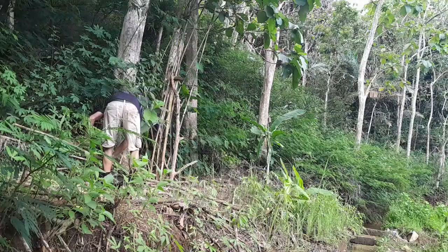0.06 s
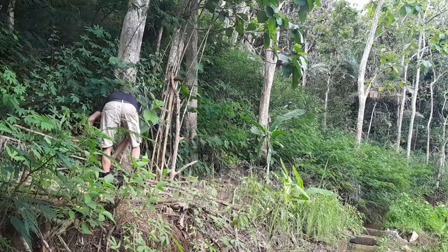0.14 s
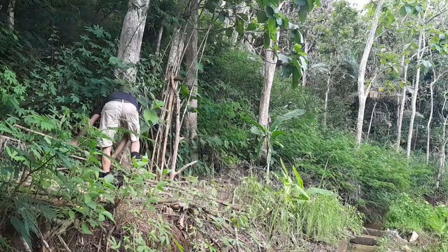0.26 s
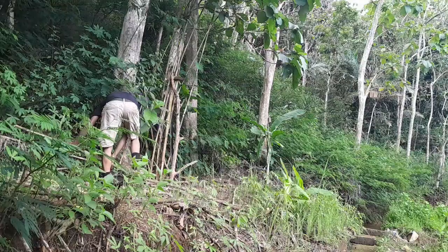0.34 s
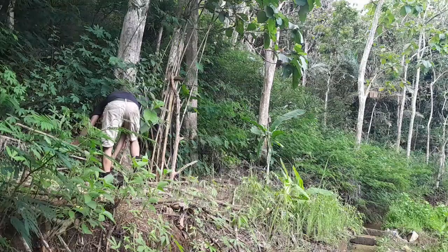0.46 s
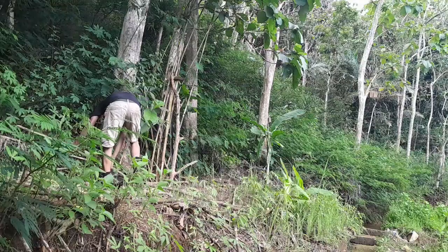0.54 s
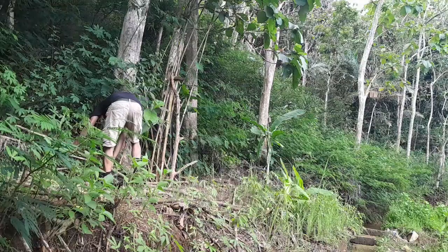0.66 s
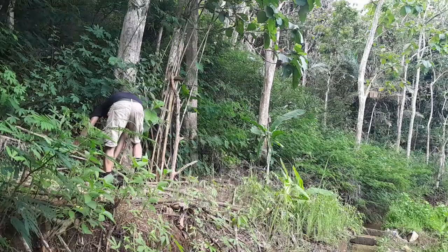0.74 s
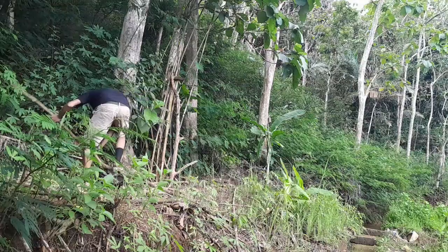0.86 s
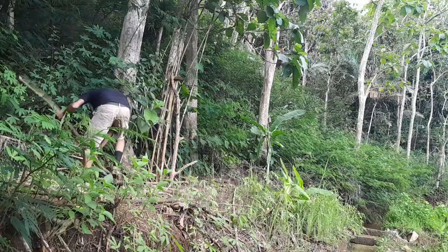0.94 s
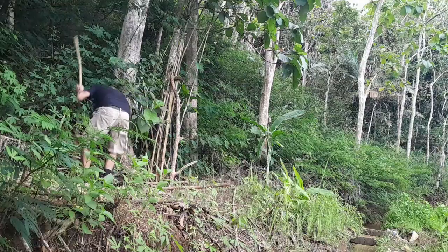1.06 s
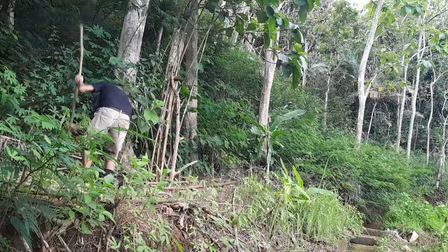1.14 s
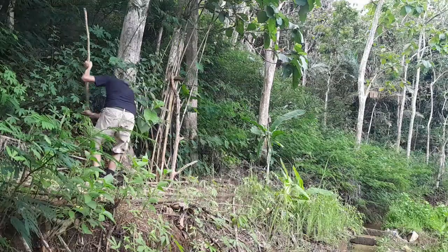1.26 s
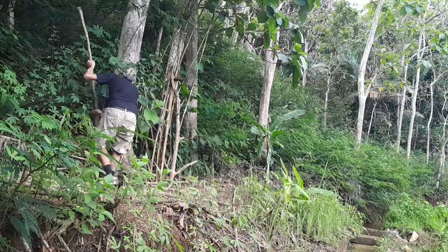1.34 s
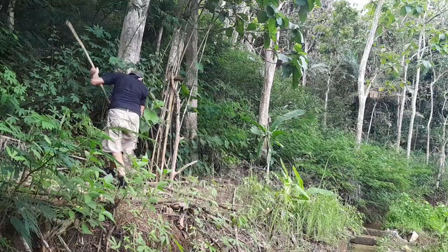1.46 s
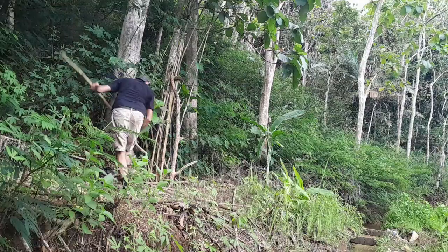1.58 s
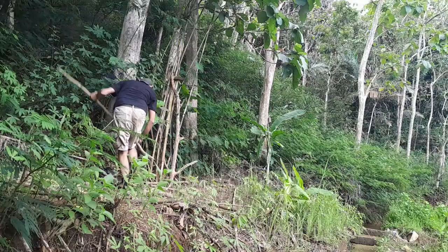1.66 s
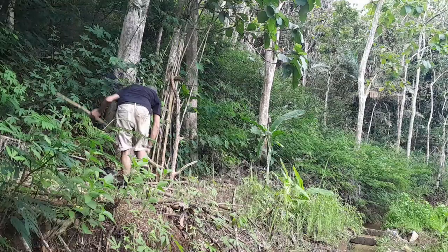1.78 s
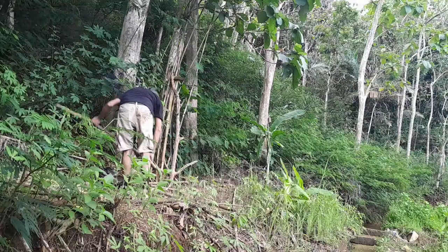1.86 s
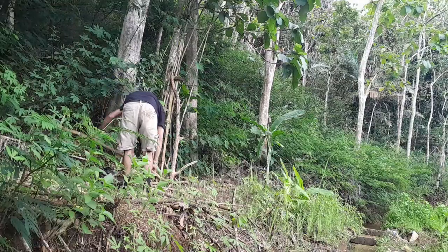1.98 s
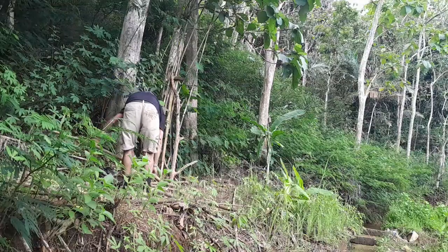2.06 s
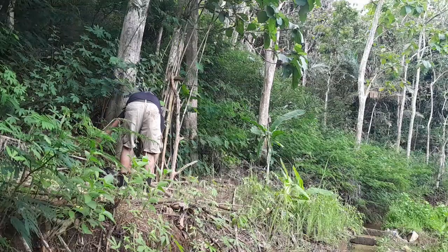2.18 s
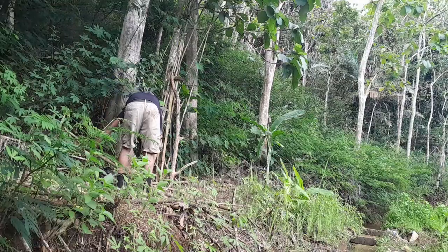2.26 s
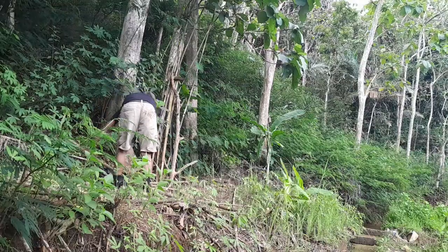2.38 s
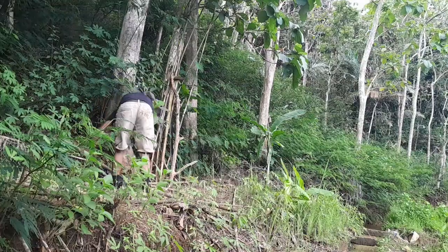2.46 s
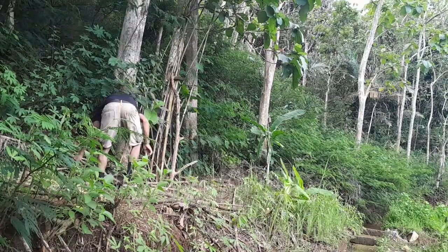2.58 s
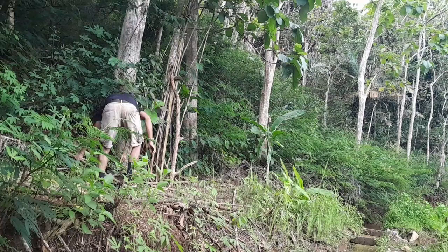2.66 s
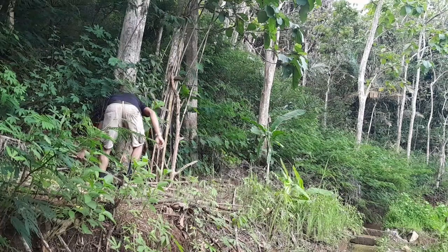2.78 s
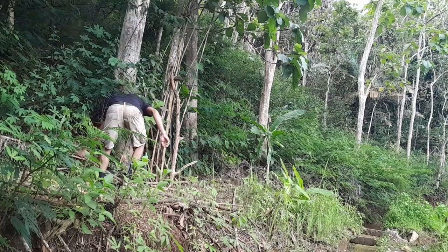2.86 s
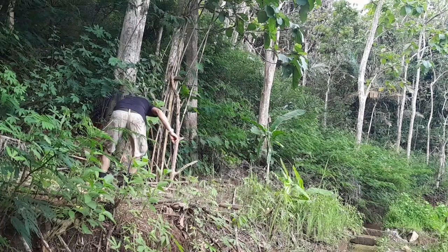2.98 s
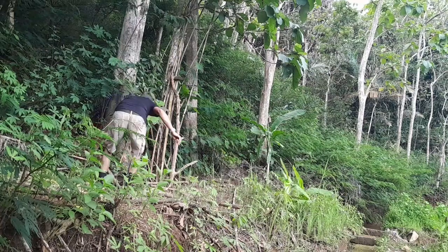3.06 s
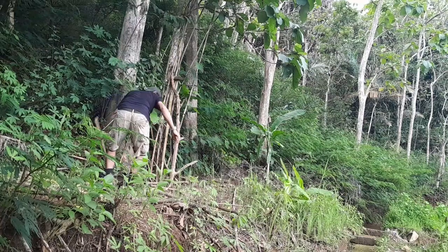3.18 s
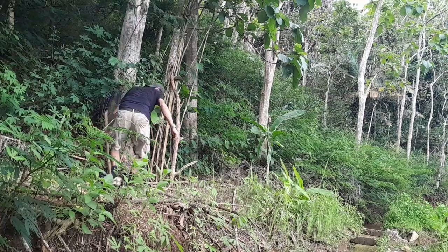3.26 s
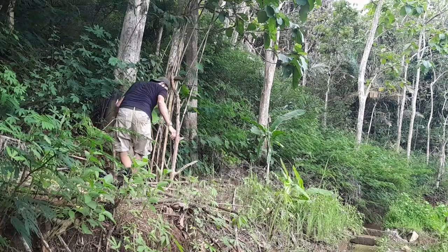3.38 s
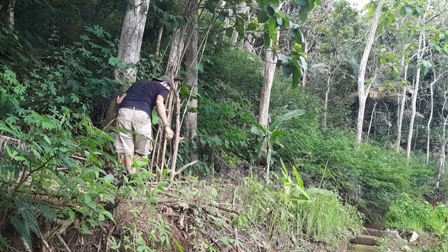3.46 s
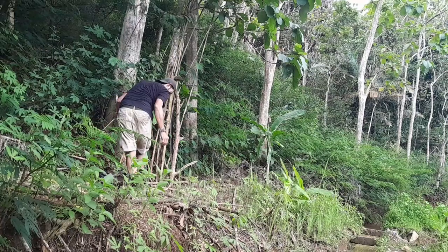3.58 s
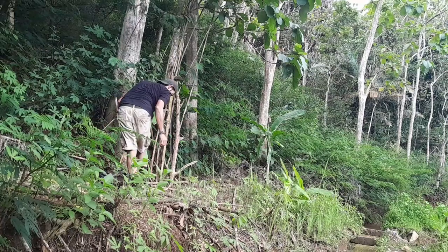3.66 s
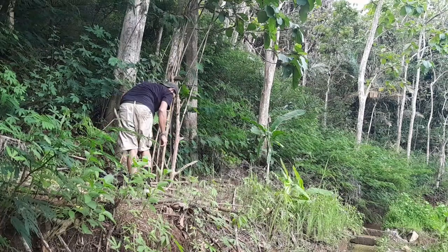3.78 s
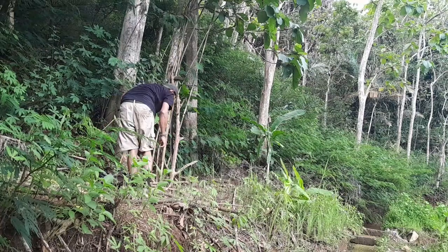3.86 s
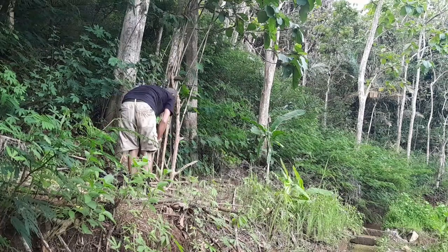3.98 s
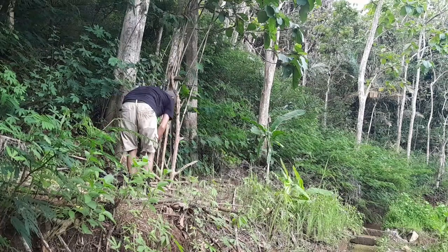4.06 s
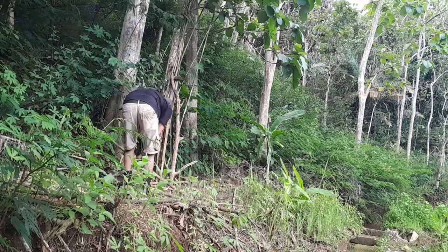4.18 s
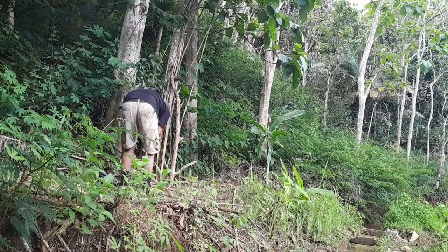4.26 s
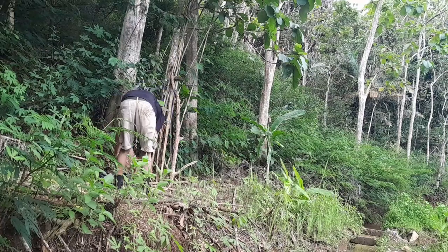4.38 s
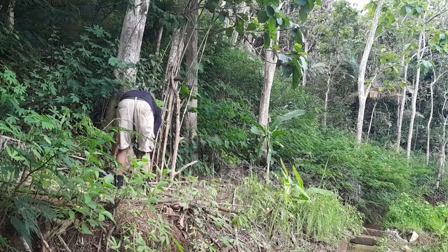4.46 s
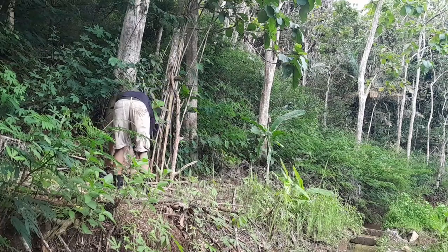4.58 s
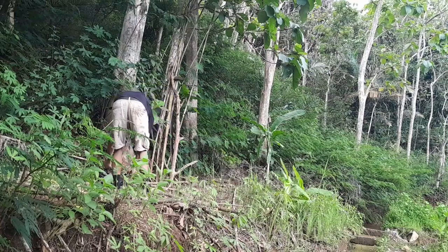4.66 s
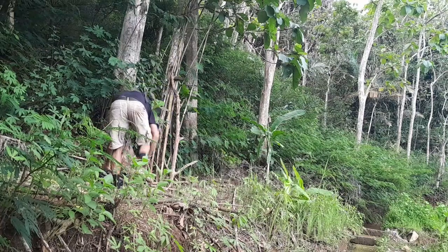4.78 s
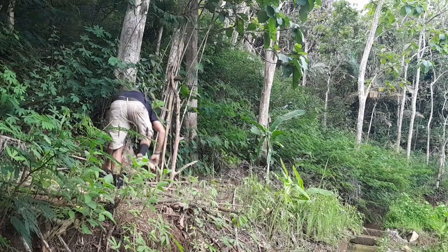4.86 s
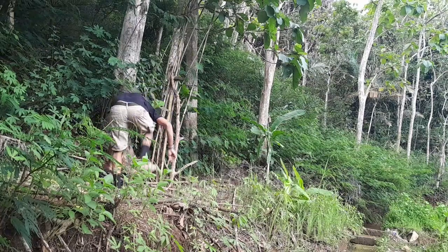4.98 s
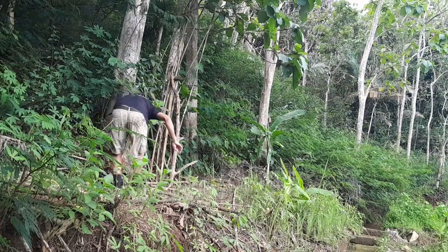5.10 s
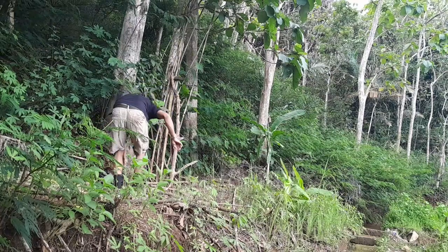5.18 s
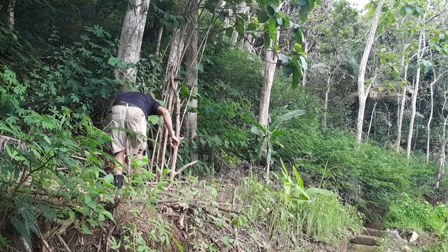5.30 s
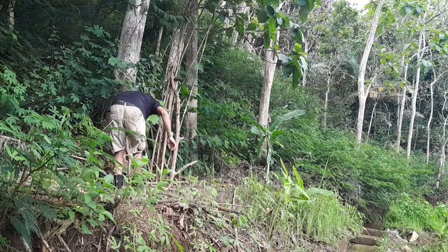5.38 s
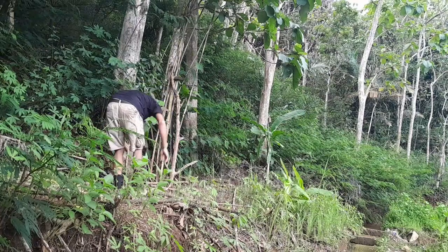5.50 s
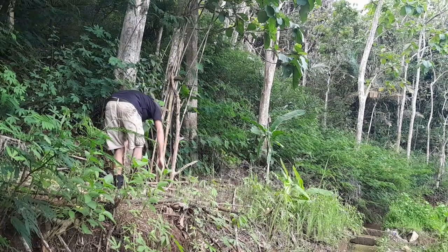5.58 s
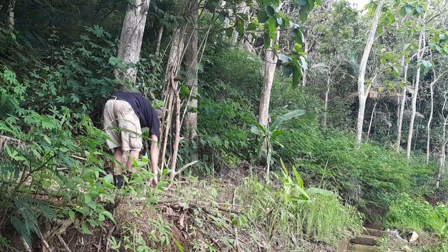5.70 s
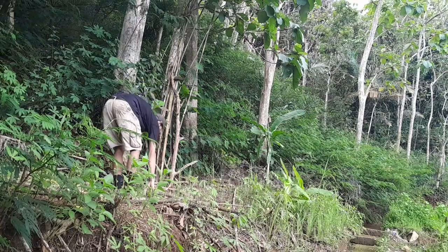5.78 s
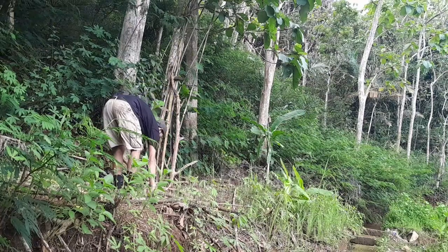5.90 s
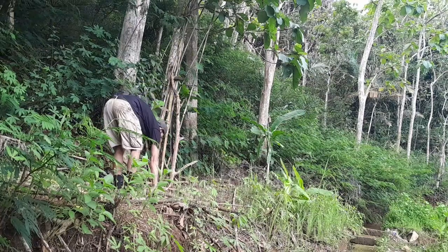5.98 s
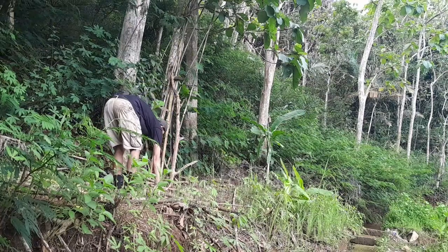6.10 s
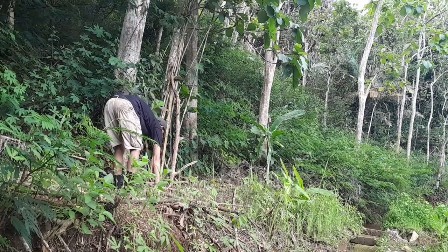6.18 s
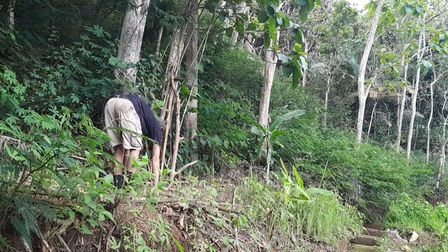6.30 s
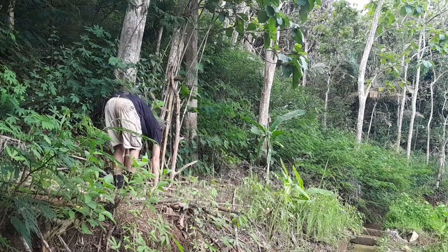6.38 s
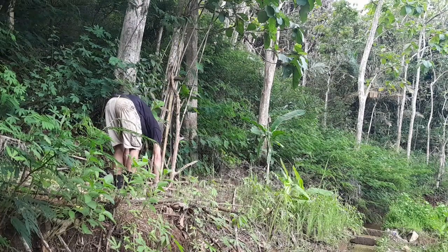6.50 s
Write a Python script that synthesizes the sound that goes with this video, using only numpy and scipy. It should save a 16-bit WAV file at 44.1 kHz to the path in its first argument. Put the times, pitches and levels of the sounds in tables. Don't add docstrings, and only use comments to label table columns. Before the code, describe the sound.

A quiet wood in stereo, the breaking wood some metres from the microphone. Soft leaf hiss and light low wind run throughout, with a faint high insect rasp throbbing about nine times a second until 2.9 s and a thin distant insect chorus continuing. A twig ticks at 0.2 s. At 0.96 s a dry branch snaps, loud and bright, with a short woody ring and a tail scattered among trunks. Far falling bird whistles come around 0.9-1.4 and 2.4-2.9 s. Wood gives and knocks at 1.4-1.8 s, leaves rustle at 2.0, and a gust bumps near 2.2. The second crack, quickest and crisp, hits at 2.98 s; sticks knock lightly at 3.2-3.6, twigs tick past 4. After a small low puff and wooden pre-crack, the third, softer, thicker snap lands at 5.09 s. Small ticks and rustles follow at 5.6-5.75 and 6.3-6.4 s.

```python
import sys
import numpy as np
from scipy import signal
from scipy.io import wavfile

SR = 44100
rng = np.random.default_rng(int(sys.argv[2]) if len(sys.argv) > 2 else 0)


def magnitude_from_level(level_db):
    exponent = np.asarray(level_db, float) / 20
    return 10 ** exponent


def to_wav(sig):
    pcm = np.clip(np.atleast_2d(sig), -1, 1) * 32767
    pcm = np.round(pcm).astype(np.int16)
    wavfile.write(sys.argv[1], SR, pcm.T)


N = 288320

# t/s, peak/dB, tearing/ms, thump/dB, scatter/dB
SNAPS = [
    (0.9574, -9.5, 3.6, -20, -22),
    (2.9797, -9, 2.9, -22, -20.5),
    (5.094, -12, 5.3, -17, -20),
]


def in_time(rows):
    return np.interp(np.arange(N) / SR, *np.transpose(rows))


def at_hz(points, hz):
    points_hz, value = np.transpose(points)
    return np.interp(np.log(hz), np.log(points_hz), value)


def total_db(spectrum, low_hz, high_hz):
    return 10 * np.log10(np.sum(magnitude_from_level(2 * at_hz(spectrum, np.arange(low_hz, high_hz)))))


def drift(rate_hz):
    r = np.exp(-2 * np.pi * rate_hz * 40 / SR)
    slow = signal.lfilter([1], [1, -2 * r, r * r], rng.standard_normal(N // 40 + 2002))[2000:]
    return np.interp(np.arange(N) / 40, np.arange(len(slow)), slow / slow.std())


def resonate(x, hz, width_hz):
    r = np.exp(-np.pi * width_hz / SR)
    zeros = np.array([1, 0, -1]) * (1 - r * r) / 2
    return signal.lfilter(zeros, [1, -2 * r * np.cos(2 * np.pi * hz / SR), r * r], x)


def add(out, start_s, sound, pan_db=0):
    i = round(start_s * SR)
    placed = sound * magnitude_from_level(np.array([[.5], [-.5]]) * pan_db)
    out[:, i:i + sound.shape[-1]] += placed[:, :N - i]


def swells(rows):
    t = np.arange(N) / SR
    return sum(magnitude_from_level(2 * db) * np.exp(-((t - s) / half_s) ** 2) for s, db, half_s in rows)


def after_snaps(peak_db, rise_s):
    since = [np.maximum(np.arange(N) / SR - s, 0) / rise_s for s, *_ in SNAPS]
    return magnitude_from_level(2 * peak_db) * sum((u * np.exp(1 - u)) ** 2 for u in since)


def snaps():
    # f/Hz, width/Hz, level/dB in first, second, third break
    crack_modes = [(314, 150, -12, -11.5, -9.5), (650, 300, -10.5, -8, -2.5), (1193, 300, -8, -2.5, -4.5),
                   (1650, 1040, -29, -11, -1), (2400, 720, -18, -1, -30), (3670, 840, -7.5, -12, -3),
                   (2930, 390, -25, -31, -2), (4980, 270, -5, 0, -23), (7150, 3000, 2, -3, -1),
                   (11850, 2700, -6, -15, -5.5), (14900, 1700, -10, -9, -9)]
    # f/Hz, level/dB, t60/s
    ring_modes = [(1073, -29, 0.43), (1313, -41.5, 0.78), (1460, -37, 0.58), (1726, -29, 0.58),
                  (2114, -33, 0.24), (2430, -49, .35), (2720, -31.5, 0.53)]
    out, t = np.zeros((2, N)), np.arange(SR // 2) / SR
    for k, (s, peak_db, tearing_ms, thump_db, _) in enumerate(SNAPS):
        fibres = rng.standard_normal((3, len(t))) * np.exp(-(t * 1000 / tearing_ms) ** 3)
        fibres[:, 4] += 7.0
        crack = 0
        for j, (hz, width_hz, *level_db) in enumerate(crack_modes):
            volley = fibres[0] * min(900 / hz, 1) + fibres[1:] * min(hz / 2500, 1)
            voice = resonate(volley, hz, width_hz * 1.08)
            voice = resonate(voice, hz, width_hz * 1.08)
            voice /= np.linalg.norm(voice, axis=1, keepdims=True)
            tilt_db = np.array([[-1], [1]]) * hz / 6000
            crack = crack + magnitude_from_level(level_db[k] + tilt_db) * (-1) ** j * voice
        thump = np.sin(2 * np.pi * 170 * t) * np.exp(-t / 0.005)
        add(out, s, magnitude_from_level(peak_db + 9.0) * (1.63 * crack + magnitude_from_level(thump_db) * thump), pan_db=-1.2)

    ring = 0
    for hz, db, t60_s in ring_modes:
        beat = np.cos(2 * np.pi * hz * 0.00647 * t)
        ring = ring + magnitude_from_level(db - 60 * t / t60_s) * np.sin(2 * np.pi * hz * t) * beat
    add(out, SNAPS[0][0], ring * (1 - np.exp(-t / 0.0028)))
    return out


def touches():
    # t/s, peak/dB, pitch/Hz, left-right/dB, scatter/dB
    knocks = [(0.675, -53, 3140, 13, -20), (1.605, -42.5, 695, 2, -34), (1.801, -35.5, 1440, 1, -27),
              (3.229, -43, 580, 7, -13.5), (3.443, -48, 912, 5, -13), (3.566, -49.5, 2800, 2, -17),
              (4.752, -55, 2020, 5, -20), (6.274, -45, 785, 1.5, -17), (6.387, -50.5, 656, -22, -6),
              (3.456, -51, 790, 4, -19), (4.766, -49, 1900, 7, -25), (6.388, -46, 1500, -4, -18)]
    # t/s, peak/dB, pitch/Hz, left-right/dB
    ticks = [(0.1924, -50, 4450, -4), (1.5798, -47, 3760, 2), (2.0344, -61, 3210, 0.5),
             (3.5653, -54, 5960, -2), (4.125, -59, 3420, -24), (4.2285, -50, 7150, 4),
             (4.315, -46, 4480, 7), (5.5944, -51, 4790, -7), (5.649, -49, 4240, -1.5),
             (6.3876, -43, 4220, -8)]
    # t/s, peak/dB, pitch/Hz, t60/s, scatter/dB
    giving = [(.9512, -27, 5000, 0.0026, -16), (.9512, -29, 12000, 0.0036, -40),
              (1.022, -21, 12500, .003, -30), (1.423, -36.5, 725, 0.0063, -10),
              (1.4256, -30, 1260, .015, -34), (1.428, -32, 463, 0.037, -14), (1.4255, -36, 760, 0.068, -19),
              (1.428, -44, 3900, .01, -19), (1.8027, -46, 2970, 0.0092, -21),
              (5.0668, -26, 560, 0.018, -18), (5.0668, -39.5, 2630, 0.0077, -8),
              (5.0762, -40, 3000, 0.0066, -7), (5.0762, -36.5, 6600, 0.0045, -7),
              (5.652, -52, 12500, .006, -24), (6.389, -43.5, 2670, 0.024, -19)]
    rows = [(s, db, hz, 0.031, pan_db, far_db) for s, db, hz, pan_db, far_db in knocks]
    rows += [(s, db, hz, 0.0036, pan_db, -25) for s, db, hz, pan_db in ticks]
    rows += [(s, db, hz, t60_s, 0.5, far_db) for s, db, hz, t60_s, far_db in giving]
    return rows


def taps():
    out, t = np.zeros((2, N)), np.arange(SR // 10) / SR
    for s, peak_db, hz, t60_s, pan_db, _ in touches():
        touch = rng.standard_normal((3, len(t))) * np.exp(-t * 12 / t60_s)
        touch[0, 0] += 2.5
        knock = resonate(touch[0] + 0.43 * touch[1:], hz, 2.0 / t60_s + 0.085 * hz)
        knock = knock + 0.19 * resonate(touch[1:], min(hz * 3.04, 15000), hz / 2)
        knock = resonate(knock, hz * 1.1, hz * 1.6)
        add(out, s, magnitude_from_level(peak_db + 1.5) * knock / np.abs(knock).max(), pan_db)
    return out


def pushes():
    # t/s, peak/dB, f/Hz, length/s
    puffs = [(2.191, -42, 60, 0.065), (2.215, -46, 115, 0.044), (4.494, -45, 94, 0.016),
             (4.939, -37, 52, 0.065), (5.068, -27, 180, 0.0107), (5.728, -50, 139, 0.032)]
    out, t = np.zeros((2, N)), np.arange(SR // 10) / SR
    for s, peak_db, hz, length_s in puffs:
        swell = np.sin(np.pi * np.minimum(t / length_s, 1))
        add(out, s, magnitude_from_level(peak_db) * np.sin(2 * np.pi * hz * t) * swell)
    return out


def scatter_power(hz, grain):
    # f/Hz, level/dB per Hz
    colours = [
        [(150, -29), (300, -4), (600, -7), (1100, -5.5), (1800, -2.5), (3000, -2), (4700, -3), (7000, -7.5),
         (9200, -12), (12000, -11.5), (16000, -18)],
        [(150, -5), (300, -11), (600, -10.5), (1100, -8.5), (1800, -4.5), (3400, -0.5), (5000, -1.5),
         (7500, -5), (9000, -10.5), (12000, -7), (16000, -15)],
        [(150, -6), (300, -5), (600, -5.5), (1100, -8), (1800, -7), (3400, -1), (5000, -1.5), (7500, -3),
         (9200, -10.5), (12000, -3.5), (16000, -19)],
    ]
    # f/Hz, t60/s
    scatter_t60 = [(150, 0.23), (500, 0.27), (1400, .45), (3700, 0.49), (8000, 0.41), (15000, 0.35)]
    build_s, stand_s = .008, 0.013
    blows = np.zeros(N)
    for (s, peak_db, *_, scatter_db), colour in zip(SNAPS, colours):
        colour_db = at_hz(colour, hz) - total_db(colour, 150, 18000)
        blows[round(s * SR)] = magnitude_from_level(2 * (peak_db + scatter_db + 10 + colour_db))
    for s, peak_db, pitch_hz, *_, scatter_db in touches():
        off_pitch_db = 8.0 * abs(np.log2(hz / pitch_hz))
        blows[round(s * SR)] = magnitude_from_level(2 * (peak_db + scatter_db - off_pitch_db)) / pitch_hz
    fall = magnitude_from_level(-120 / (at_hz(scatter_t60, hz) * SR))
    build = np.exp(-1 / (build_s * SR))
    dying = signal.lfilter([1], [1, -fall], blows + 1e-24)
    crowd = 0.39 * dying + signal.lfilter([(1 - build) ** 2], [1, -2 * build, build ** 2], dying)
    far_slope = signal.lfilter([.03], [1, -np.sqrt(fall)], blows + 1e-24)
    stand = 0.19 * np.roll(dying, round(stand_s * SR))
    shadow_db = min(hz / 9000, 1) ** 3 * np.array([[-1.3], [1.3]])
    return (crowd + stand + far_slope) * grain * magnitude_from_level(2 * shadow_db)


def bands(gain_at):
    # f/Hz, left-right likeness
    likeness = [(60, 0.89), (180, 1), (550, 0.6), (1650, 0.17), (4970, 0.038), (15000, -0.12)]
    left_lag_s = .00046
    back, front = 0, 0
    edges_hz = 28 * 2 ** (np.arange(29) / 3)
    white = rng.standard_normal((2, 2, N)) * np.sqrt(SR / 4)
    for k, (low, high) in enumerate(zip(edges_hz, edges_hz[1:])):
        band = signal.butter(2, [low, high], "band", fs=SR, output="sos")
        mid, side = signal.sosfilt(band, white[k % 2])
        hz = np.sqrt(low * high)
        alike = np.clip(at_hz(likeness, hz), -.99, .99)
        noise = np.sqrt(1 + alike) * mid + np.sqrt(1 - alike) * side * [[1], [-1]]
        back_gain, front_gain = gain_at(hz)
        back = back + back_gain * np.roll(noise, N // 3, axis=1)
        front = front + front_gain * noise
    back[0] = np.roll(back[0], round(left_lag_s * SR))
    return back + front


def wood_and_wind():
    # t/s, level/dB
    leaf_level = [(0.0, -56.5), (1.5, -58), (2.9, -56), (3.6, -60), (5.0, -57), (6.54, -60)]
    # f/Hz, level/dB per Hz
    hiss_colour = [(250, -5.5), (450, -7), (800, -11.5), (1500, -14), (2500, -17.5), (4000, -19),
                   (6000, -22), (7800, -24.5), (9200, -25), (12000, -30), (16000, -34.5)]
    # middle t/s, level/dB, half length/s
    rustles = [(2.022, -65.5, 0.013), (2.876, -71, .02), (4.967, -64, .04), (5.746, -55, 0.018),
               (6.315, -63, 0.048)]
    # t/s, level/dB
    wind_level = [(0.0, -73), (0.6, -64.5), (1.4, -56), (2.0, -67), (2.5, -52), (2.93, -53), (3.5, -60),
                  (4.0, -55), (4.7, -53.5), (5.4, -52.5), (5.85, -57.5), (6.54, -57.5)]
    # middle t/s, level/dB, half length/s
    gusts = [(.13, -54, 0.18), (.76, -57, 0.036), (.89, -53.5, 0.038), (1.29, -55, 0.027),
             (1.5, -56.5, 0.053), (1.8, -53, 0.04), (2.24, -43.5, 0.088), (2.39, -46.5, 0.028),
             (2.13, -58, 0.041), (3.19, -63, 0.032), (3.46, -54, 0.018), (4.2, -57, .03), (4.5, -53, 0.023),
             (4.6, -57, 0.044), (4.96, -45.5, 0.025), (5.24, -50.5, 0.028), (5.74, -47, 0.023),
             (5.96, -55.5, .05)]
    # f/Hz, level/dB per Hz
    rumble_colour = [(15, -40), (25, -7), (59, 0), (149, 1.5), (237, -3), (310, -12.5), (487, -19.5),
                     (541, -15), (647, -25), (900, -20), (1170, -51), (1980, -120)]

    boom = after_snaps(-47.5, 0.038)
    hiss_swell = after_snaps(-53, 0.091)
    wind_db = 10 * np.log10(magnitude_from_level(2 * in_time(wind_level)) + swells(gusts) + boom)
    wind_db = wind_db - total_db(rumble_colour, 70, 300) + 1.2 * drift(29)
    leaves_db = 10 * np.log10(magnitude_from_level(2 * in_time(leaf_level)) + hiss_swell) - total_db(hiss_colour, 960, 16000)
    rustle = swells(rustles) * magnitude_from_level(6.9 * drift(150))
    grain = magnitude_from_level(2.5 * drift(160))

    def gain_at(hz):
        hiss_db = at_hz(hiss_colour, hz)
        wind = magnitude_from_level(2 * (wind_db + at_hz(rumble_colour, hz) + .8 * drift(8)))
        hiss = magnitude_from_level(2 * (leaves_db + hiss_db + 0.98 * drift(45)))
        dry_leaf = rustle * magnitude_from_level(1.53 * hiss_db) / 400 * (hz > 400)
        shade_db = -4.5 * min(hz / 12000, 1) ** 2 * np.array([[.5], [-.5]])
        return np.sqrt(wind + hiss + dry_leaf) * magnitude_from_level(shade_db), np.sqrt(scatter_power(hz, grain))
    return bands(gain_at)


def bird():
    # t/s, level/dB, start f/Hz, length/s
    notes_sung = [(0.887, -61, 2600, 0.047), (1.114, -55, 2520, 0.1), (1.267, -61, 2780, .04),
                  (1.304, -55.5, 2430, 0.07), (2.363, -60, 2590, 0.08), (2.46, -65, 2550, .07),
                  (2.539, -60, 2400, 0.044), (2.626, -66, 2480, 0.1), (2.713, -54.5, 2450, 0.055),
                  (2.82, -74, 2530, .06), (2.893, -58.5, 2430, 0.076)]
    fall_hz_per_s = 3700
    out = np.zeros((2, N))
    for s, level_db, from_hz, length_s in notes_sung:
        share = np.arange(round(length_s * SR)) / (length_s * SR)
        pitch_hz = from_hz - fall_hz_per_s * length_s * share ** 1.74
        whistle = np.sin(np.pi * share) * np.sin(2 * np.pi * np.cumsum(pitch_hz) / SR)
        add(out, s, magnitude_from_level(level_db) * whistle)
    t = np.arange(SR // 3) / SR
    echoes = rng.standard_normal((2, len(t))) * magnitude_from_level(-60 * t / .45)
    echoes /= np.linalg.norm(echoes, axis=1, keepdims=True)
    return 1.5 * (0.8 * out + 1.1 * signal.fftconvolve(out, echoes, axes=1)[:, :N])


def insects():
    # first t/s, last t/s
    bouts = [(.01, .848), (1.03, 2.515), (2.572, 2.893)]
    throb_every_s, throb_s = .106, .048
    t, swell = np.arange(N) / SR, np.zeros(N)
    for first_s, last_s in bouts:
        count = round((last_s - first_s) / throb_every_s) + 1
        for s in np.linspace(first_s, last_s, count):
            swell += np.exp(-(2 * (t - s) / throb_s - 1) ** 4)
    rasp = rng.standard_normal((2, N)) * (0.71 + np.cos(np.pi * 230 * t) ** 2)
    near = resonate(resonate(rasp, 6920, 400), 6920, 400)
    far = resonate(resonate(rng.standard_normal((2, N)), 7230, 450), 7230, 450)
    near = magnitude_from_level(-63.0) * swell * near / near.std() * magnitude_from_level([[-2], [2]])
    return near + magnitude_from_level(-73.0 + 1.3 * drift(10)) * far / far.std()


def scene():
    return snaps() + taps() + pushes() + wood_and_wind() + bird() + insects()


def roll_off(x):
    return signal.sosfilt(signal.butter(12, 17020, fs=SR, output="sos"), x)


def record(dry):
    dry = dry - .5 * resonate(dry, 9260, 2570)
    dry = signal.sosfilt(signal.butter(4, 41, "high", fs=SR, output="sos"), dry)
    dry = 1.492 * np.tanh(dry / 1.51)
    dry = signal.sosfilt(signal.ellip(8, .5, 60, 15900, fs=SR, output="sos"), dry)
    return roll_off(dry)


dry = scene()
out = record(dry)
to_wav(out)
```